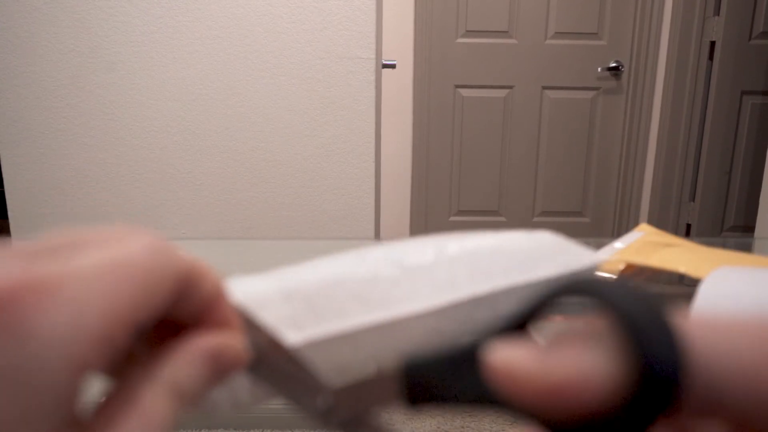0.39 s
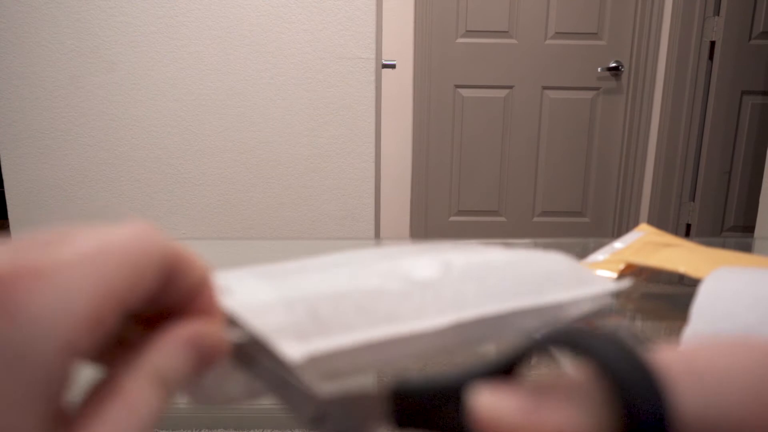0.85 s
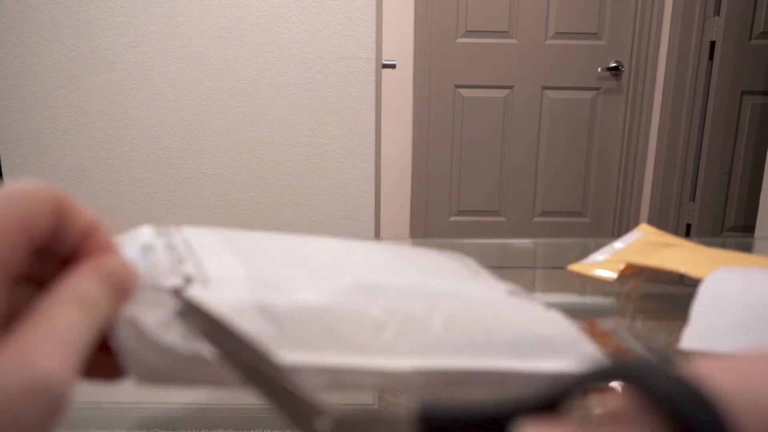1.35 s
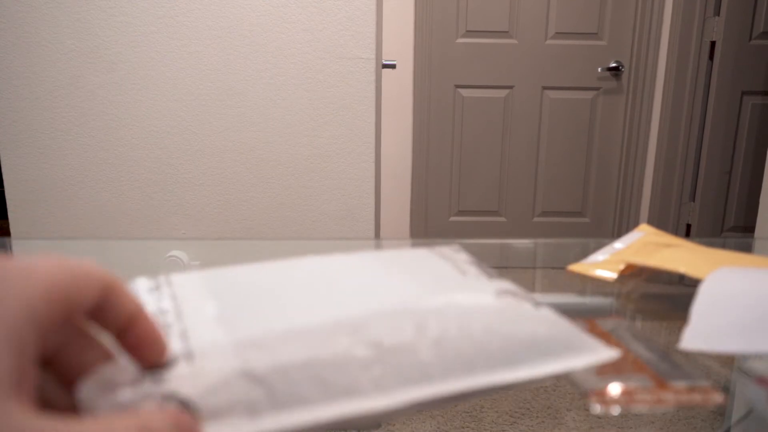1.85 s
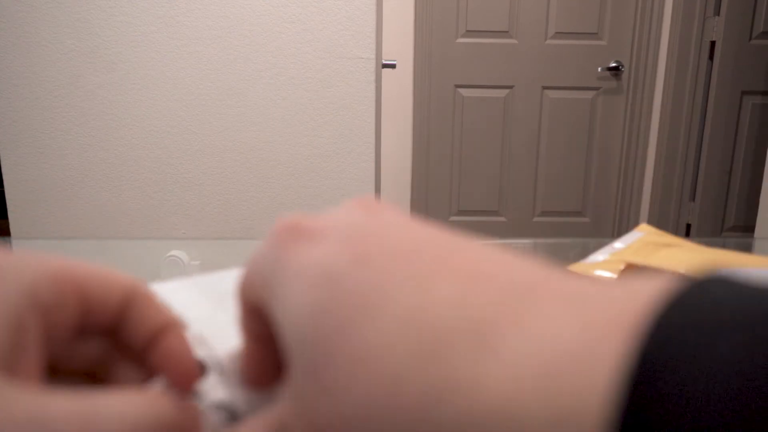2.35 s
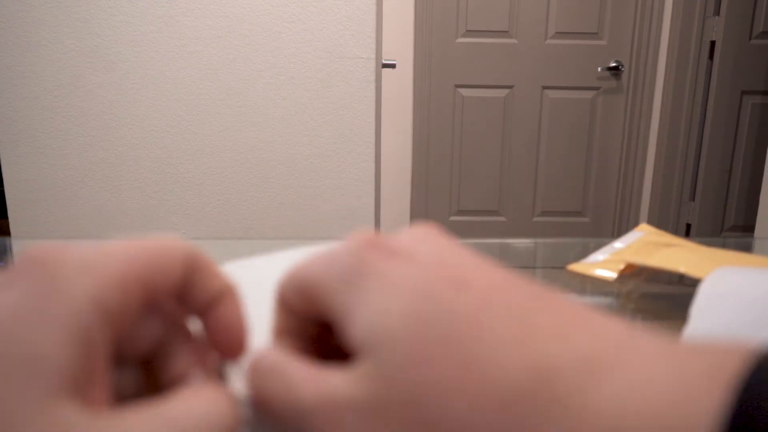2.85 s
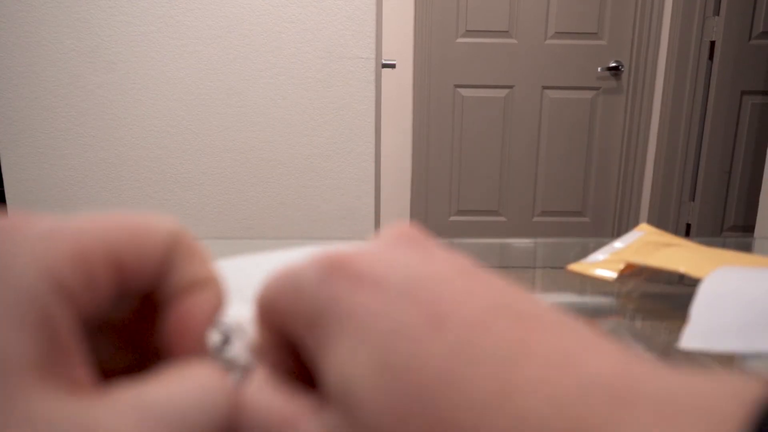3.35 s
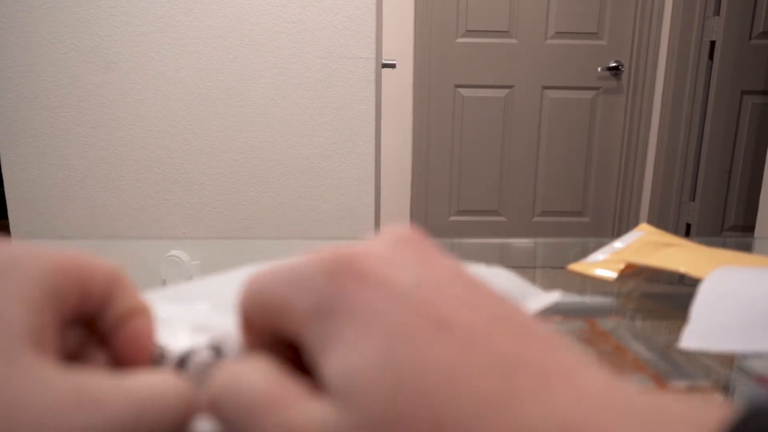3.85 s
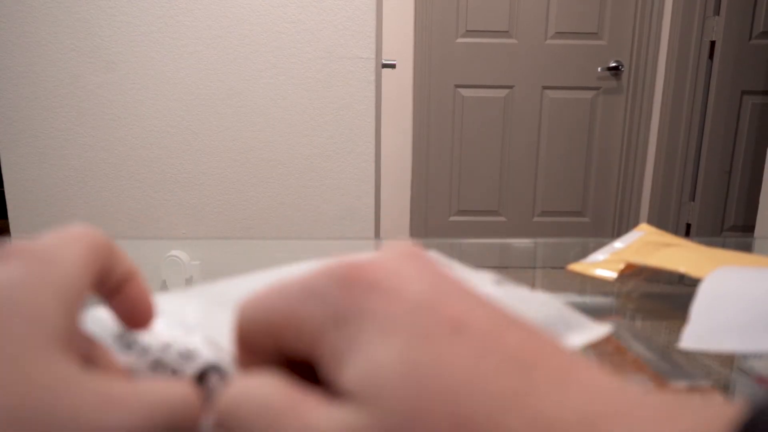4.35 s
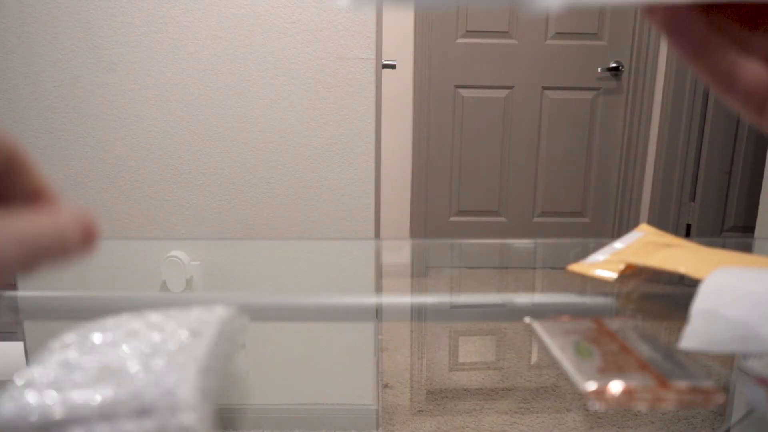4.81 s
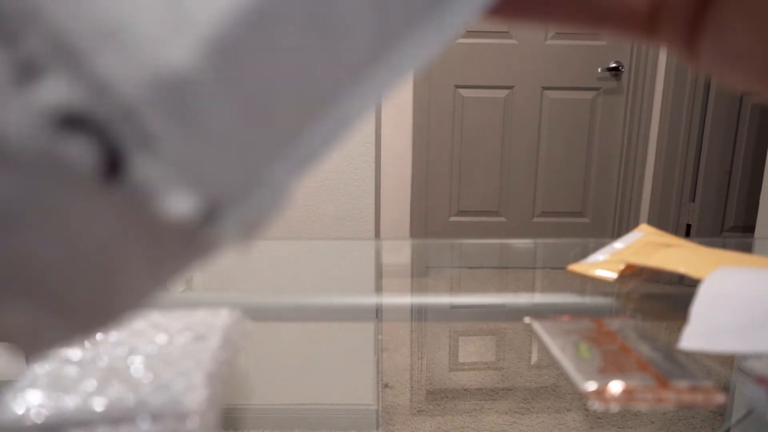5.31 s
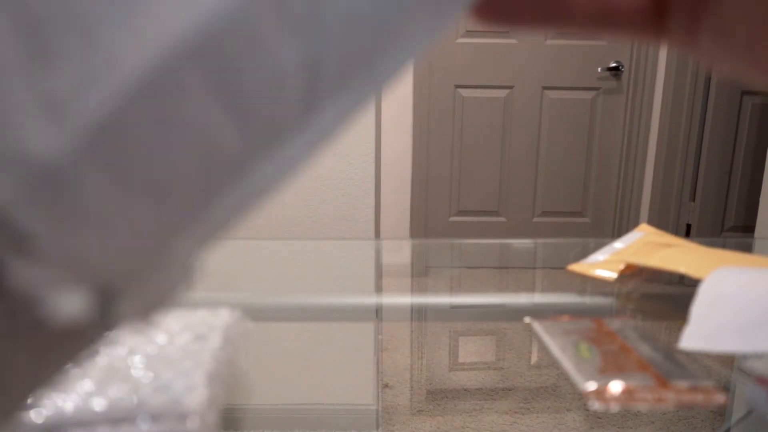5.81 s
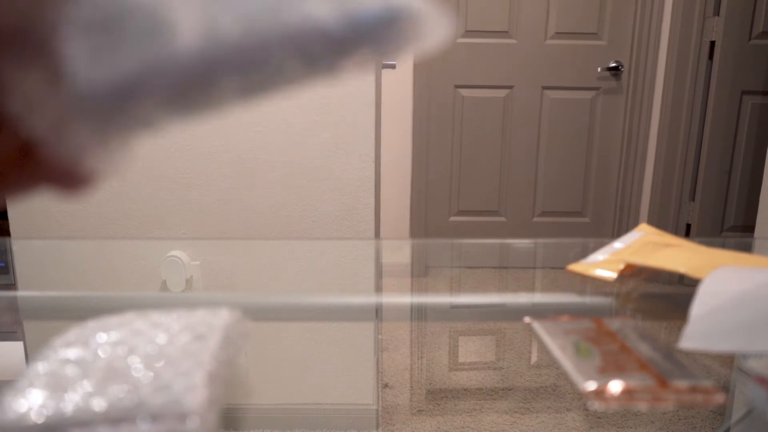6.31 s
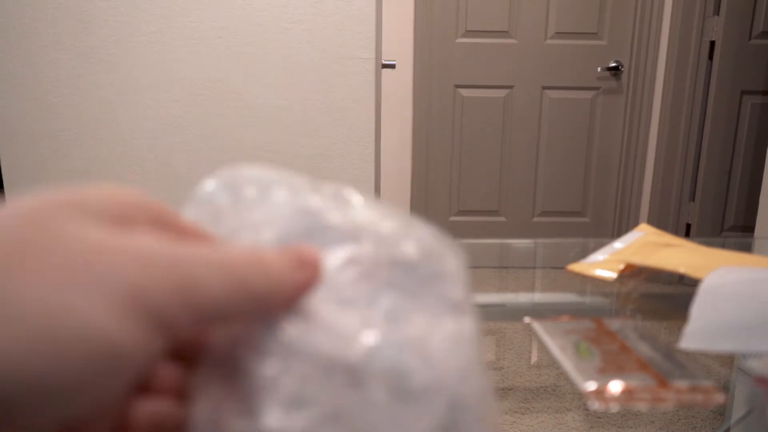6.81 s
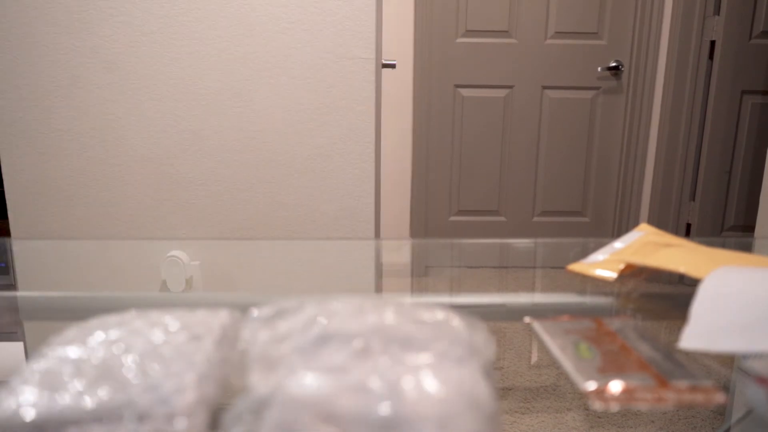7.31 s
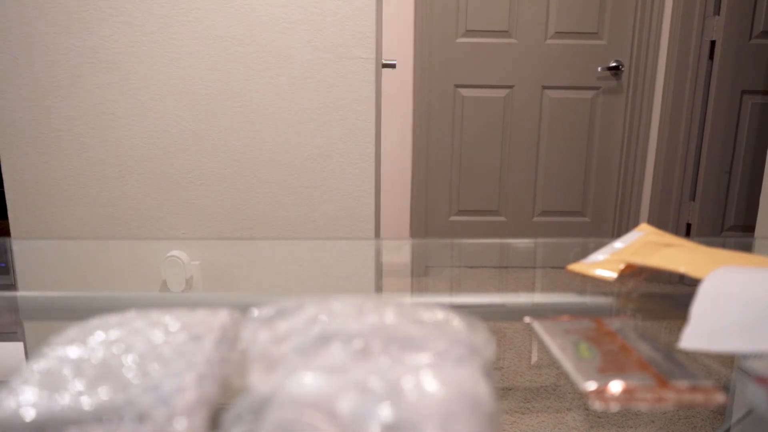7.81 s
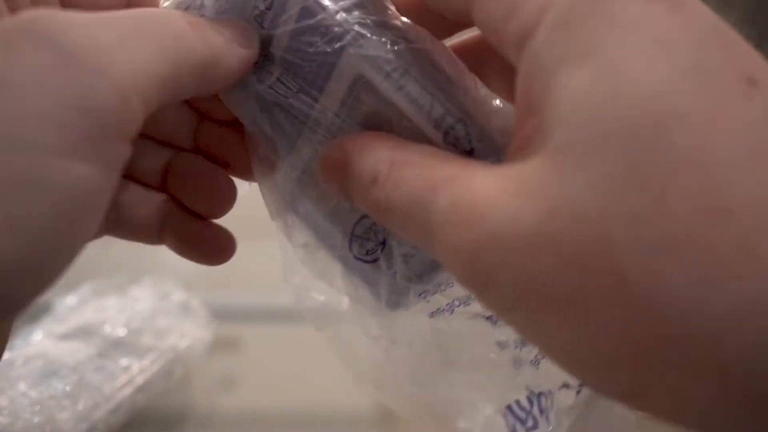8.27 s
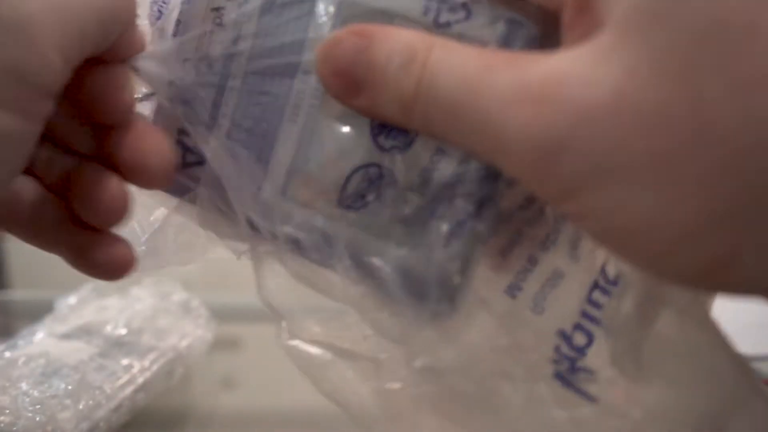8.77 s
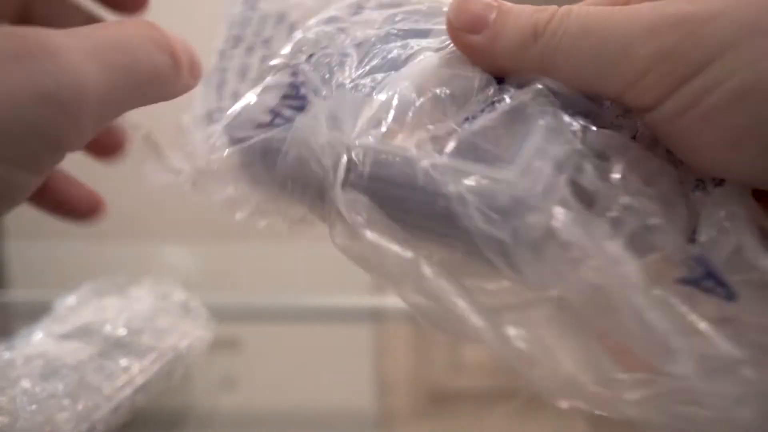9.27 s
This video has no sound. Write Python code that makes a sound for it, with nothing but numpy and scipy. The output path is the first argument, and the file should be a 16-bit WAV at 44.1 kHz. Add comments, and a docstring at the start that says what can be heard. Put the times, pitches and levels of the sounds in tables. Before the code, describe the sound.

Very close in a small quiet room, scissors snip through a padded envelope in separate crunchy bursts. A rush of rustling follows, then smaller pinches and sharp snaps as the opening is pried apart. Bubble wrap slides out in a fuller swell, soft thumps land on the table, and after a short lull bright plastic crinkles under the hands to the end.

```python
"""Hands cut open a padded envelope on a glass table, pry it apart and slide bubble wrap out, close to two
microphone ports. Film and paper buckle in clumped random snaps: noise cracks for the film, damped resonances
for air pockets and sheets, with single loud snaps on top. Short low sines thud through the table, narrow noise
is its lasting note, and decaying noise tails answer as a small room over air noise and a faint mains hum."""
import sys
import numpy as np
from scipy import signal
from scipy.fft import rfft, irfft
from scipy.io import wavfile
from scipy.ndimage import uniform_filter1d

SR = 44100
rng = np.random.default_rng(int(sys.argv[2]) if len(sys.argv) > 2 else 0)


def waveform_to_disk(signal):
    """Save audio, clipped to [-1, 1], as 16-bit WAV at the path in sys.argv[1]."""
    frames = np.transpose(np.atleast_2d(signal))
    scaled = np.clip(frames, -1, 1) * 32767
    samples = np.round(scaled).astype(np.int16)
    wavfile.write(sys.argv[1], SR, samples)


def natural_amplitude(level_db):
    """Convert a level in decibels to a linear amplitude factor, elementwise."""
    exponent = np.asarray(level_db, float) / 20
    return 10 ** exponent


N = 414540

# Resonances of the air pockets. Each row: frequency in Hz, width in Hz, level in dB, before random variation.
POCKET_MODES = [(1017, 600, -1), (1125, 270, 0), (1570, 705, 6)]
# Likeness of the two ports. Each row: frequency in Hz, likeness from 0 (unrelated) to 1 (same).
PORT_LIKENESS = [(100, 1), (700, 0.66), (2000, 1), (6000, 1)]


def evened(x):
    """Scales to rms 1."""
    return x / np.sqrt(np.mean(x ** 2) + 1e-20)


def read(points, hz):
    """Reads a table on a log-frequency axis."""
    f, value = np.transpose(points)
    return np.interp(np.log(hz + 1), np.log(f + 1), value)


def curve(rows):
    """Columns of a time table, one value a sample."""
    s, *columns = np.transpose(rows)
    return [np.interp(np.arange(N) / SR, s, c) for c in columns]


def band(x, lo_hz, hi_hz):
    """Band-pass, its upper edge at most 20 kHz."""
    sos = signal.butter(3, [lo_hz, min(hi_hz, 20000)], "bandpass", fs=SR, output="sos")
    return signal.sosfilt(sos, x)


def add(mix, s, sound):
    """Mixes a stereo sound in at s seconds."""
    part = mix[:, round(s * SR):][:, :sound.shape[1]]
    part += sound[:, :part.shape[1]]


def partly_alike(left, other, hz):
    """Spectra for two ports: the second shares with the first what the likeness table says."""
    same = np.clip(read(PORT_LIKENESS, hz), 0, 1)[:, None]
    return np.array([left, same * left + np.sqrt(1 - same ** 2) * other])


def air():
    """Still room air as shaped stereo noise, with mains hum as one steady sine."""
    # Each row: frequency in Hz, relative level in dB.
    air_colour = [(15, -34), (25, 22), (70, -21), (124, 6), (167, 8), (979, 1), (1390, -24), (4730, -6),
                  (14800, -10), (16500, -51)]
    air_db, hum_hz, hum_db = -56.5, 118.4, -60.5  # rms levels
    frames, hz, t = N // 512 + 5, np.fft.rfftfreq(2048, 1 / SR), np.arange(N) / SR
    a, b, c, d = rng.standard_normal((frames, 1025, 4)).T
    spectra = partly_alike(a + 1j * b, c + 1j * d, hz) * natural_amplitude(read(air_colour, hz))[:, None]
    noise = signal.istft(spectra, nperseg=2048, noverlap=1536)[1][:, :N]
    hum = np.sqrt(2) * natural_amplitude(hum_db) * np.sin(2 * np.pi * hum_hz * t)
    return natural_amplitude(air_db) * evened(noise) + hum


def room(x):
    """Noise tails dying band by band, alike at both ports in the bass; moving hands excite changing paths."""
    # Each row: frequency in Hz, time to die by 60 dB in seconds.
    decay_times = [(250, 0.098), (1000, 0.17), (4000, 0.23), (12000, 0.12)]
    out = np.zeros((2, N))
    turn = np.arange(N) / SR * 7  # radians
    for k in range(3):
        noise = rng.standard_normal((2, SR // 2))
        noise *= np.arange(SR // 2) > 180  # a gap of 4 ms ahead of the tail
        hz, t, (first, second) = signal.stft(noise, SR, nperseg=256)
        decay = natural_amplitude(-60 * t / read(decay_times, hz)[:, None])
        tail = signal.istft(partly_alike(first, second, hz) * decay, SR, nperseg=256)[1]
        # the three paths trade places while their summed power stays level
        fed = x.mean(0) * np.cos(turn + k * np.pi / 3) * np.sqrt(2 / 3)
        out += signal.oaconvolve(fed[None], tail / np.linalg.norm(tail[0]), axes=1)[:, :N]
    return out


def table():
    """Hands and parcels push low damped sines through the glass top; narrow noise is its wavering note."""
    # Each row: start in seconds, level in dB ahead of the push's envelope, frequency in Hz.
    thuds = [(0.402, -32, 79), (1.399, -19, 264), (4.069, -38, 72.7), (4.138, -31, 61.9),
             (4.228, -35.5, 59.3), (6.099, -36, 80.7), (6.669, -38, 51.1), (7.233, -24.5, 199),
             (7.353, -29, 75.4), (7.533, -27.5, 68.6), (8.426, -25, 330), (8.817, -26, 284)]
    # Each row: time in seconds, rms level of the lasting note in dB.
    glass_level = [(0.0, -64), (0.266, -43), (1.1, -65.5), (6.4, -59.5), (7.2, -60)]
    glass_hz = 385.5
    out, t = np.zeros((2, N)), np.arange(6000) / SR
    for s, db, hz in thuds:
        cycles = hz * t
        push = np.sin(2 * np.pi * cycles) * cycles * np.exp(1 - cycles / 0.74)
        add(out, s, natural_amplitude(db) * np.tile(push, (2, 1)))
    note = evened(band(rng.standard_normal(N), glass_hz - 12, glass_hz + 12))
    return out + note * natural_amplitude(curve(glass_level)[0])


def crack(colour_hz, decay_s, lift_db, lag_s, top_db=0, unlike=0.84):
    """A crease flips: a brief burst of noise, reaching one microphone port a little later."""
    # Colour of buckling film. Each row: frequency in Hz, gain in dB.
    film_colour = [(590, -35), (1000, -5), (1330, -6), (2190, 0), (3350, -1), (13000, -10), (15600, -14),
                   (16500, -30)]
    t, hz = np.arange(1024) / SR, np.fft.rfftfreq(1024, 1 / SR)
    common, left, right = rng.standard_normal((3, 1024)) * t ** 2 * np.exp(-t / decay_s)
    peak_db = lift_db / (1 + ((hz - colour_hz) / (0.076 * colour_hz)) ** 2)
    treble_db = top_db / (1 + (6500 / (hz + 1)) ** 4)
    low_cut = hz ** 4 / (hz ** 4 + 860.0 ** 4)
    tone = natural_amplitude(read(film_colour, hz) + peak_db + treble_db) * low_cut
    delay = np.exp(2j * np.pi * hz * lag_s * np.array([[.5], [-.5]]))
    own = unlike * hz / (hz + 4000)  # the ports differ more in the treble
    spectra = (1 - own) * rfft(common) * delay + own * rfft(np.array([left, right]))
    return irfft(spectra * tone)


def ring(modes, stretch):
    """A soft push rings a few damped resonances, larger or smaller each time."""
    t = np.arange(2048) / SR
    out = np.zeros(len(t))
    for hz, width_hz, db in modes:
        decay = np.exp(-np.pi * width_hz * stretch * t)
        tone = np.sin(2 * np.pi * (hz * stretch * t + rng.random()))
        out += natural_amplitude(db + 3.2 * rng.standard_normal()) * decay * tone
    return out * (1 - np.exp(-t * modes[0][0] * 4.4))  # soft onset


def resonate(x, hz, width_hz):
    """A resonance that follows the curve hz, applied twice for steep flanks."""
    turn, r = np.exp(2j * np.pi * np.cumsum(hz) / SR), np.exp(-np.pi * width_hz / SR)
    return (turn * signal.lfilter([1], np.convolve([1, -r], [1, -r]), x / turn)).real


def snaps():
    """Each loud snap is a crack, higher the brighter it is, and the pop of the air pocket behind it."""
    # Each row: start in seconds, level in dB ahead of trim and panning, air pocket's share in dB
    # (-0.5 at most), brightness in dB, which sets the crack's colour and treble.
    loud_snaps = [(0.051, -8.5, -28, -3), (0.118, -5, -24, -5.5), (0.209, -13, -0.5, -2),
                  (0.498, -17.5, -1.5, -17), (0.708, -4.5, -11, -9), (0.84, -15, -23, -10),
                  (0.849, -8.5, -10, -11), (0.953, -11, -14, -4.5), (1.002, -10, -10, -0.5),
                  (1.165, -8.5, -11, -5.5), (1.249, -16, -10, -3), (1.263, -7, -10, -4),
                  (1.402, -10, -1.5, -8), (1.457, -8.5, -10, -1.5), (1.62, -12, -12, -0.5),
                  (1.691, -14.5, -10, -5), (1.716, -4, -10.5, 1), (1.839, -24, -17, -8),
                  (2.047, -11, -24, -11.5), (2.306, -7.5, -31, -12), (2.339, -14, 2, -17),
                  (2.403, -13.5, -7, 1), (2.43, -11, -5.5, -9), (2.475, -10, -5.5, -7.5),
                  (2.549, -6, -16, -5), (2.731, -6, -13, -24), (2.821, -8.5, -3, -27),
                  (2.863, -15.5, -11, -6), (2.897, -24, -10, -18), (3.013, -15.5, 4, -6),
                  (3.125, -10, -20, -4.5), (3.511, -15.5, -13, -3), (3.61, -18.5, 2.5, -14),
                  (3.674, -11, -5, -1), (3.725, -9, -5.5, -15), (3.825, -20.5, 6, -14),
                  (3.861, -16.5, 0, -9), (3.894, -9, -3, 4), (3.905, -6.5, -21, -1),
                  (3.947, -10.5, -4.5, 4), (4.006, -6, -18, -0.5), (4.017, -15.5, -0.5, -3),
                  (4.103, -8.5, -25, -4.5), (4.166, -18.5, 0, -14), (4.2, -11.5, -28, -3),
                  (4.249, -18.5, -13, -13), (4.278, -10, -22, -6), (4.288, -9.5, -17, -8),
                  (4.308, -10.5, 0, -23), (4.332, -15, -22, -9), (4.353, -8.5, -13.5, -6),
                  (4.399, -15, 11, 5), (5.375, -8, 0, -12), (5.441, -17, -18, -16), (5.6, -8, -13, -6.5),
                  (5.702, -10, -9.5, -8), (5.763, -6.5, -20, -10), (5.776, -10, -16, -10),
                  (6.379, -10.5, -37, -11), (6.777, -14, -26, 0.5), (6.835, -16.5, -7, -15),
                  (6.952, -17, -11, -15), (7.251, -3.5, -28, -9.5), (7.258, -9, -9.5, -8),
                  (7.297, -9, -8.5, -14.5), (7.331, -12, -10, -23), (7.382, -7, -10.5, -19),
                  (7.536, -10.5, -1.5, -8), (7.855, -21, -22, -5), (8.057, -6.5, -16, -15),
                  (8.094, -7, -26, -13), (8.157, -6.5, -18, -11), (8.261, -9, -35, -13),
                  (8.375, -4, -22, -2.5), (8.768, -6.5, -11, -9), (8.8, -3, -24, -9),
                  (8.806, -5.5, -12, -6), (8.818, -15, -8, -7), (8.892, -18, -10, -6),
                  (9.011, -13.5, -5, -17)]
    out = np.zeros((2, N))
    for s, db, pocket_db, bright_db in loud_snaps:
        side, size = rng.uniform(-0.72, 1, 2)
        colour_hz = 3600 * natural_amplitude(0.47 * (bright_db + 10.5))
        lag_s = .00003 + .00008 * side
        tick = crack(colour_hz, 0.00022, 8, lag_s, top_db=2.16 * (bright_db + 9.0), unlike=0.37)
        pop = ring(POCKET_MODES, 0.99 ** size)[:tick.shape[1]]
        share = natural_amplitude(min(pocket_db, -.5))
        sound = np.sqrt(1 - share ** 2) * tick / abs(tick.mean(0)).max() + share * pop / abs(pop).max()
        add(out, s, sound * natural_amplitude(db - 2.0 + 2.5 * side * np.array([[1], [-1]])))
    return out


def handling(linger, with_pockets):
    """Strength of all moves together: each swells from silence, then dies exponentially."""
    # Each snip, pinch, tug or squeeze. Each row: peak in seconds, film crackle in dB, swell in seconds
    # (0.002 at least), fall by 20 dB in seconds ahead of linger (then 0.01 at least),
    # air pockets against the film in dB.
    moves = [(0.09, -39.5, 0.2, -0.02, -6.5), (0.208, -30.5, 0.075, 0.14, 0.5), (0.523, -41, 0.12, 0.14, 1),
             (0.656, -43.5, 0.027, 0.28, 7), (0.704, -36, 0.052, 0.22, -17), (0.85, -33.5, 0.0017, .15, -5),
             (0.96, -36.5, 0.062, 0.12, -2.5), (1.176, -31, 0.046, 0.21, -3), (1.27, -35, 0.17, 0.3, -4.5),
             (1.465, -43.5, 0.33, 0.1, 4.5), (1.66, -38.5, 0.017, 0.15, 2.5),
             (1.716, -30, 0.001, .18, -3.5), (1.84, -28, .003, 0.13, -5.5), (1.898, -24, 0.0043, 0.19, -5),
             (1.99, -27.5, 0.099, 0.18, -7.5), (2.05, -29.5, 0.072, 0.12, 1.5),
             (2.305, -33.5, 0.032, 0.5, -2.5), (2.476, -31, 0.0093, 0.07, 3.5),
             (2.56, -39.5, 0.035, 0.43, -3), (2.669, -28.5, 0.017, 0.23, 0.5),
             (2.74, -33.5, 0.037, 0.2, -9), (2.86, -36.5, 0.041, 0.41, 1), (3.13, -43.5, 0.12, 0.3, -1),
             (3.29, -41, 0.1, 0.27, -4), (3.511, -48, 0.005, 2, 3), (3.676, -34.5, 0.0059, 0.21, 2.5),
             (3.722, -29, 0.08, 0.02, -1), (3.9, -42.5, 0.12, 0.56, 5.5), (4.111, -34.5, 0.04, .2, 0.5),
             (4.283, -34, 0.0052, 0.23, 1.5), (4.402, -32.5, 0.048, 0.13, 4.5),
             (4.577, -37, 0.25, 0.44, -20), (4.753, -32.5, 0.13, 0.1, -6.5), (5.014, -43, 0.001, 0.5, 0.5),
             (5.261, -30.5, 0.23, 0.67, -1), (5.37, -27, 0.18, 0.46, -3.5),
             (5.511, -21.5, 0.0033, 0.12, -3.5), (5.57, -27.5, 0.14, 0.11, -1.5),
             (5.69, -26.5, 0.066, 0.66, -10), (5.924, -22.5, 0.13, 0.35, -4), (6.11, -23, 0.18, 0.29, -0.5),
             (6.285, -22, 0.22, 0.0463, -1), (6.44, -37, 0.021, 0.1, -6), (6.58, -41, 0.36, 1, -9.5),
             (6.737, -35, 0.0097, 0.2, -9), (6.835, -31.5, 0.016, 0.57, -6.5),
             (7.099, -29, 0.062, 0.09, -4), (7.237, -29.5, 0.001, -0.0051, 8),
             (7.344, -29.5, 0.17, 0.11, -1.5), (7.431, -25, 0.056, 0.09, -6),
             (7.533, -20.5, 0.0041, 0.03, -6), (7.56, -42, 0.02, 0.27, -11),
             (7.864, -45.5, 0.011, 0.05, -10), (7.936, -28, 0.001, 0.37, -7),
             (8.05, -27.5, 0.11, 0.16, -22.5), (8.145, -22.5, 0.086, -0.06, -11.5),
             (8.25, -28, 0.12, 0.76, -15), (8.476, -24.5, 0.13, 0.16, -5.5),
             (8.602, -23.5, 0.046, 0.3, -7.5), (8.752, -23.5, 0.24, 0.01, -13), (8.82, -32, 0.013, 0.28, 0),
             (9.0, -28, 0.33, 0.24, -10.5), (9.17, -29.5, 0.14, 0.24, -8), (9.4, -29, .12, -6, -8)]
    t = np.arange(0, N + 128, 128) / SR
    s, db, rise_s, fall_s, pocket_db = np.transpose(moves)[:, :, None]
    swell = np.clip(1 + (t - s) / np.maximum(rise_s, .002), 0, 1) ** 1.17
    fall_db = 20 * np.maximum(t - s, 0) / np.maximum(fall_s * linger, .01)
    fading = natural_amplitude(db + with_pockets * pocket_db - fall_db)
    return np.interp(np.arange(N) / SR, t, np.sqrt(((swell * fading) ** 2).sum(0)))


def snap_train():
    """Random impulses of either sign in drifting clumps, evened so that the hands set the strength."""
    # How finely the material crackles. Each row: time in seconds, mean snaps a second,
    # spread of their sizes in dB.
    grain = [(0, 800, 4), (1.9, 2600, 2.5), (2.3, 550, 4.5), (4.5, 600, 4.5), (5.2, 1700, 3.5),
             (6.3, 2600, 3), (6.45, 1200, 3), (9.4, 1500, 4)]
    rate, spread_db = curve(grain)
    drift = uniform_filter1d(uniform_filter1d(rng.standard_normal(N), 500), 300)
    clumps = natural_amplitude(3 * evened(drift))  # 3 dB rms
    sizes = natural_amplitude(spread_db * np.minimum(rng.exponential(1, N), 4.2))
    happens = rng.random(N) < rate * clumps / clumps.mean() / SR
    train = sizes * happens * rng.choice([-1, 1], N)
    return train / np.sqrt(abs(uniform_filter1d(train ** 2, 3000)) + 1e-6)


def crackle():
    """Clumped random snaps, each kind from its own spot, drive film, pockets and sheets together."""
    # Each row: time in seconds, treble of the film in dB, large sheets against the film in dB.
    colour_curve = [(0, 0, -9.5), (1.4, 3, -5.5), (1.9, -2, -4.5), (2.3, -1, -13.5), (4.4, 2.5, -9),
                    (4.75, -0.5, -24.5), (5.3, 1, -2.5), (5.65, 0, -17.5), (6.25, -1, -9),
                    (6.5, -3.5, -13.5), (7.5, 0.5, -13), (8.25, 2, -22.5), (8.45, 0.5, -13),
                    (8.76, -1, -20), (8.85, 0.5, -8.5), (9.4, -1, -21.5)]
    # Resonances of the sheets. Each row: frequency in Hz, width in Hz, level in dB, before random variation.
    sheet_modes = [(120.4, 64, -9.5), (193, 96, -16), (300, 77.5, -1.5), (432, 120, 1)]
    # A padded parcel rings like a hollow whose mouth changes as it slides or lands.
    # Each row: time in seconds, frequency in Hz, level against the film's middle band in dB.
    hollow_curve = [(1.7, 1250, -44), (1.716, 1300, 1.5), (1.8, 1170, -12), (1.845, 1370, -6),
                    (1.9, 1680, 2), (1.98, 1570, -3), (2.2, 1290, -37), (7.22, 860, -36), (7.236, 870, -2),
                    (7.36, 780, -3.5), (7.41, 910, -40)]
    kinds, tick_share, tick_db = 24, .02, 5.5
    top_db, sheets_db = curve(colour_curve)
    train = snap_train()
    # a few snaps stand out as sharp ticks, in the thin film alone, unless they are big already
    lift = natural_amplitude(tick_db * (rng.random(N) < tick_share))
    ticking = train * lift ** (abs(train) < 6)
    heavy = train * np.sqrt(abs(train))  # mostly the big snaps move whole sheets
    spot = 6 * evened(uniform_filter1d(rng.standard_normal(N), 2500))  # the busy spot wanders
    kind = np.round(spot + 4.5 * rng.standard_normal(N)).astype(int) % kinds
    layers = np.zeros((3, 2, N))
    for k in range(kinds):
        colour, size = rng.uniform(-0.88, 1, 2)
        side = np.sin(2 * np.pi * k / kinds)  # the spots lie in a ring, left to right
        lag_s = .000015 + 0.000097 * side
        tick = crack(4500 * 1.97 ** colour, 0.00025 * 0.74 ** size, 9.6, lag_s)
        pop = np.roll(ring(POCKET_MODES, 1.3 ** size), 8)
        pockets = [np.roll(pop, round(-3 * side - 1)), np.roll(pop, round(3 * side + 1))]
        shapes = (tick, pockets, [ring(sheet_modes, 1.29 ** colour)] * 2)
        for layer, shape, wide_db, drive in zip(layers, shapes, (2.5, 2.5, .6), (ticking, train, heavy)):
            ports = evened(np.array(shape)) * natural_amplitude(wide_db * side * np.array([[1], [-1]]))
            layer += signal.oaconvolve((drive * (kind == k))[None], ports, axes=1)[:, :N]
    film = evened(band(layers[0], 1590, 4760)) + natural_amplitude(top_db) * evened(band(layers[0], 5100, SR))
    hollow_hz, hollow_db = curve(hollow_curve)
    film += natural_amplitude(hollow_db) * evened(resonate(layers[1], hollow_hz, width_hz=420))
    sheets = natural_amplitude(sheets_db) * evened(band(layers[2], 90, 4500))
    # pockets die slower than the film, sheets slowest
    return (handling(0.9, with_pockets=0) * film
            + handling(0.96, with_pockets=1) * evened(layers[1])
            + handling(1.14, with_pockets=0) * sheets)


def scene():
    """Everything handled, its room, the table and the air."""
    near = crackle() + snaps()
    room_db = -11.5
    return near + natural_amplitude(room_db) * room(near) + table() + air()


def low_pass(x):
    """Removes everything above the highest recorded frequency."""
    return signal.sosfilt(signal.butter(12, 16100, fs=SR, output="sos"), x)


def record(dry):
    """The input stage rounds off the sharpest peaks."""
    rounded = np.tanh(dry / 0.78)
    return low_pass(rounded)


dry = scene()
out = record(dry)
waveform_to_disk(out)
```